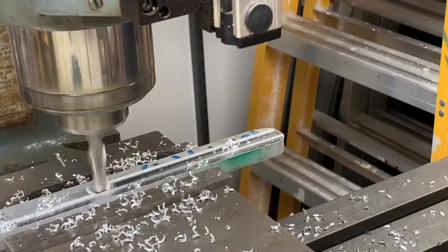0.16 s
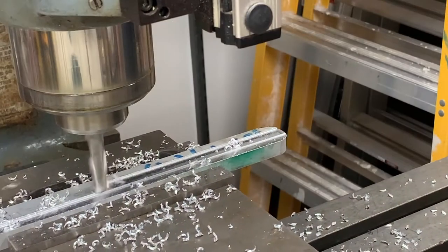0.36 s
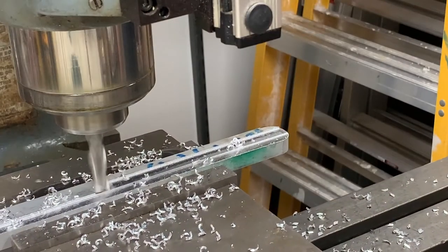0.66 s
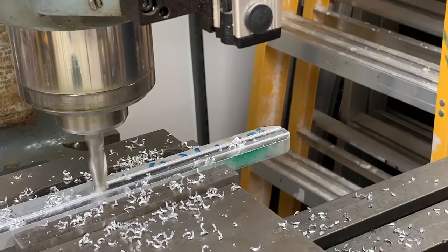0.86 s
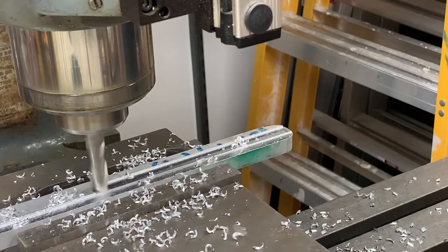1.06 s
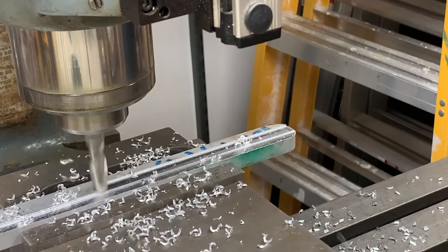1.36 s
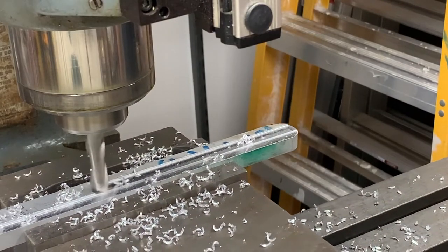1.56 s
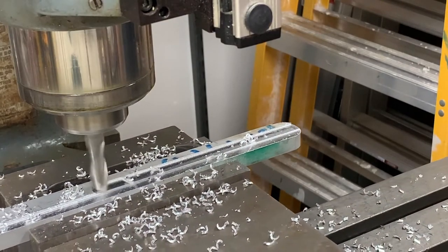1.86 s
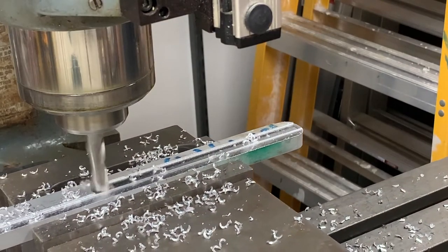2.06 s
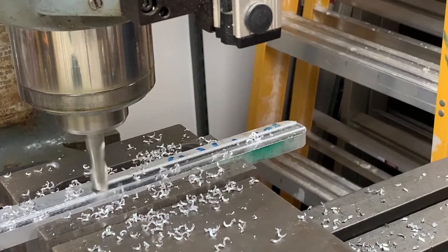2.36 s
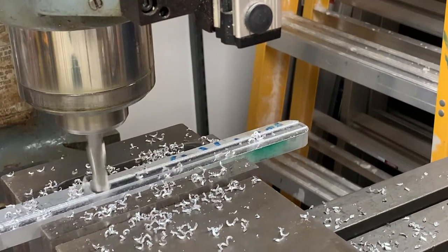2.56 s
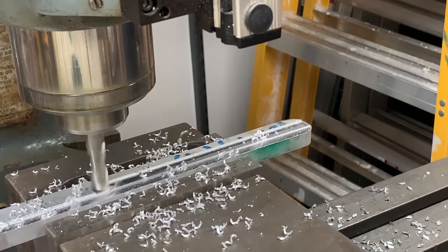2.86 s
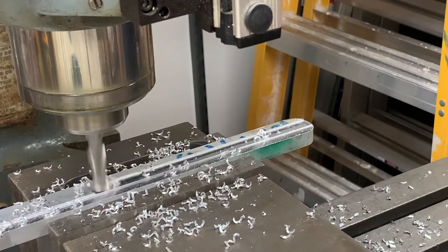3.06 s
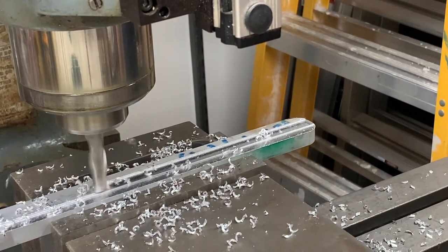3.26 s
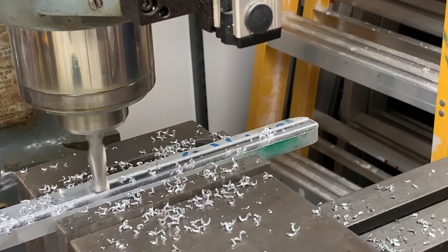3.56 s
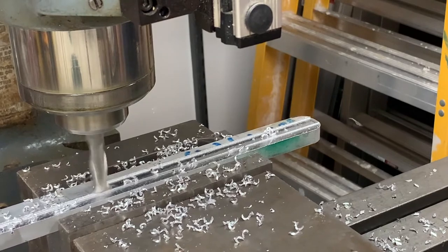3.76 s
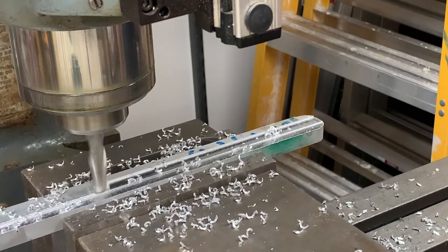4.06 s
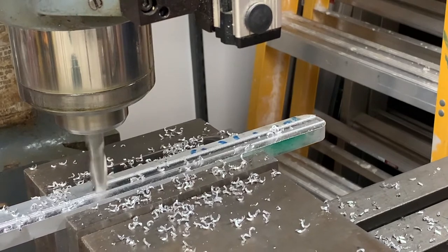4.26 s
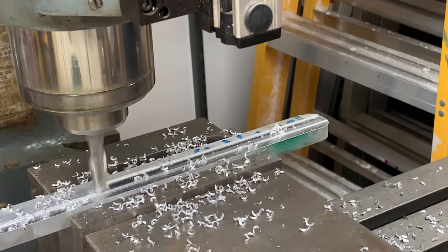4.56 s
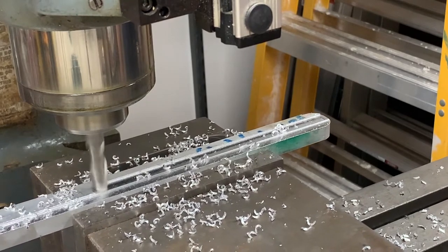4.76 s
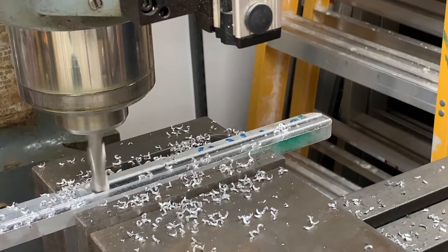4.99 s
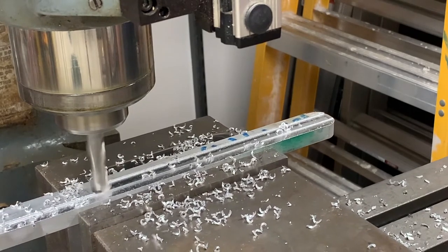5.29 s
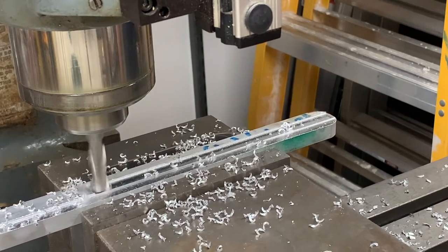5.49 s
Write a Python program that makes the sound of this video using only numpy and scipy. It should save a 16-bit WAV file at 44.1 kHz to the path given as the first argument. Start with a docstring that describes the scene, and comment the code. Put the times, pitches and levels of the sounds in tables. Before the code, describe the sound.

Close up in a small workshop, a milling machine cuts an aluminium bar without pause. A hard rasp repeats about twelve times a second, with a lighter one between, each with a short metallic clang and zing. A steady nasal gear whine and rumbling drive run underneath; curling chips squeak faintly and a few tick on the steel table.

```python
"""A two-flute milling cutter takes a steady cut along an aluminium bar in a small workshop, heard close by.
It runs off-centre: one flute rasps hard once a turn, the other lightly (shaped noise plus struck modes).
Curling chips chatter (sliding squeaks); loose ones tick against the steel table (short noise bursts).
Behind it a drive gear whines, the spindle rumbles, the motor's inverter sings (sines), and the drive rolls (noise)."""
import sys
import numpy as np
from scipy import signal
from scipy.fft import rfft, irfft
from scipy.io import wavfile
from scipy.ndimage import uniform_filter1d

SR = 44100
rng = np.random.default_rng(int(sys.argv[2]) if len(sys.argv) > 2 else 0)


def generate_wav(signal):
    """Clip the signal to [-1, 1] and save it as 16-bit WAV at the path in sys.argv[1]."""
    frames = np.transpose(np.atleast_2d(signal))
    scaled = np.clip(frames, -1, 1) * 32767
    pcm = np.round(scaled).astype(np.int16)
    wavfile.write(sys.argv[1], SR, pcm)


N = 248283
TIME = np.arange(N) / SR
FREQ = np.maximum(np.arange(N // 2 + 1) * SR / N, 1)

SPINDLE_HZ, GEAR_TEETH = 11.89, 66
HEAD_ORDER = 33  # head resonance, in multiples of the spindle rate
HISS_HZ = 2680  # above this the rasp is edge hiss
PORT_LAG_S, TOP_HZ = .000215, 15800
WHITE_RMS_GAIN = np.sqrt(SR / 2)  # unit-rms white noise to unit density per Hz


def undb(db):
    """Decibels to gain."""
    return 10 ** (np.asarray(db) / 20)


def curve(points):
    """(Hz, value) points joined on a log-frequency axis."""
    hz, value = np.transpose(points)
    return np.interp(np.log(FREQ), np.log(hz), value)


def lift(modes):
    """Minimum-phase response of a set of resonances: each rings on after it is struck."""
    lift_db = sum(db / (1 + (2 * (FREQ - hz) / width_hz) ** 2) for hz, width_hz, db in modes)
    cepstrum = irfft(np.log(undb(lift_db)), N)
    cepstrum[1:] *= 2 * (np.arange(1, N) < N / 2)  # fold to the causal half
    return np.exp(rfft(cepstrum))


def walk(rate_hz):
    """Random levels held 1 / rate_hz, smoothed twice; spread 1."""
    hold = max(int(SR / rate_hz), 1)
    steps = np.repeat(rng.standard_normal(N // hold + 1), hold)
    smooth = uniform_filter1d(uniform_filter1d(steps, hold), hold)[:N]
    return smooth / smooth.std()


def tone(cycles, level_db, pan_db=0, lag_cycles=0):
    """Stereo sine of given rms level and random phase; the right port lags."""
    angle = 2 * np.pi * (cycles + rng.random())
    left = undb(level_db + pan_db / 2) * np.sin(angle)
    right = undb(level_db - pan_db / 2) * np.sin(angle - 2 * np.pi * lag_cycles)
    return np.sqrt(2) * np.array([left, right])


def grains(spread_db):
    """Dense tiny fractures of uneven size, rms 1."""
    noise = rng.standard_normal(N) * undb(spread_db * walk(1500))
    return noise / noise.std()


def walls(t60_s=0.16):
    """One path by way of the workshop walls: a short decaying tail that ripples the spectrum."""
    tail = rng.standard_normal(N) * np.exp(-np.log(1000) * TIME / t60_s)
    return rfft(tail / np.sqrt(np.sum(tail ** 2)))


# power share of scattered and wall paths: freq_hz, share_0_to_1
SCATTER_SHARE = [(60, 0.09), (300, 0.02), (600, 0.31), (1200, 0.69), (2000, 0.88), (3300, 0.2),
                 (5000, 0.05), (9000, 0), (15000, 0)]
# stereo balance: freq_hz, left_minus_right_db
STEREO_BALANCE = [(60, 5.5), (150, -1.5), (300, 2.5), (500, 3), (750, 4), (1100, 3), (1500, 1.5), (2500, 1),
                  (4500, -0.5)]


def radiate(force, gain, spread_db, echo_share=0.46, split_hz=4650):
    """Force-driven noise coloured by the metal, heard directly, scattered, and by way of the walls."""
    direct, left, right = (rfft(force * grains(spread_db)) for _ in range(3))
    share = np.clip(curve(SCATTER_SHARE), 0, 1)
    scattered = np.array([side * (np.sqrt(1 - echo_share) + np.sqrt(echo_share) * walls())
                          for side in (left, right)])
    # machine body stands to the left, fine sizzle comes from the right
    lag_s = np.where(FREQ < split_hz, PORT_LAG_S, -PORT_LAG_S)
    ports = np.array([direct, direct * np.exp(-2j * np.pi * FREQ * lag_s)])
    both = np.sqrt(1 - share) * ports + np.sqrt(share) * scattered
    balance = undb(np.outer([1, -1], curve(STEREO_BALANCE)) / 2)
    return irfft(both * gain * balance, N)


# resonances of head, table and bar: centre_hz, width_hz, lift_db
BODY_MODES = [(666, 76, 2.5), (1082, 136, 5), (1145, 22, 5), (1323, 84, 3.5), (1586, 29, -0.5),
              (1654, 52, 6.5), (1870, 29, 2), (1920, 55, 1), (2040, 50, 6.5), (2134, 26, 7.5),
              (2170, 19, 2), (2696, 180, 3.5), (3380, 120, 5.5), (4010, 84, 4.5), (4570, 110, 3),
              (6010, 460, 5)]


def body():
    """Head, table and bar colour any noise that passes through them."""
    return lift(BODY_MODES)


# rolling noise before the body resonances: freq_hz, density_db_per_hz
DRIVE_NOISE = [(25, -85), (60, -67), (100, -65), (140, -55.5), (200, -63), (310, -62.5), (400, -55.5),
               (455, -60), (530, -56), (570, -64), (750, -67), (1900, -67.5), (2900, -77), (5500, -89),
               (10000, -92), (13000, -103), (15000, -103)]


def drive(flutter_db=1.02):
    """Bearings and belt roll on through the body resonances."""
    gain = undb(curve(DRIVE_NOISE)) * body() * WHITE_RMS_GAIN
    return radiate(undb(flutter_db * walk(40)), gain, spread_db=1.5)


# inverter switching tones: freq_hz, level_db (before trim)
INVERTER_TONES = [(9523, -69), (9711, -61.5), (9771, -81.5), (9830, -61), (9895, -63), (9954, -62.5),
                  (10018, -70), (10078, -68), (10201, -66), (10261, -63), (10325, -74), (10508, -73)]


def inverter(trim_db=-2.5):
    """Switching makes a thin steady cluster of high tones."""
    return sum(tone(hz * TIME, db + trim_db, lag_cycles=-0.18) for hz, db in INVERTER_TONES)


# motor and bearing tones: freq_hz, level_db (before trim), left_minus_right_db
BEARING_TONES = [(150.4, -48, -9.5), (796, -55, 3.5), (1047, -46, 8), (1298, -50.5, -8.5),
                 (1514, -53.5, 18), (1844, -49.5, 8.5), (1967, -54, 6.5)]


def bearings(trim_db=-2, waver_db=4.0, slip_cycles=0.21):
    """Motor and bearing tones, unsteady in level and phase."""
    return sum(tone(hz * TIME + slip_cycles * walk(14), db + trim_db + waver_db * walk(12),
                    pan_db, lag_cycles=0.13)
               for hz, db, pan_db in BEARING_TONES)


# shaking of the head: spindle_multiple, level_db (before trim)
SPINDLE_ORDERS = [(3, -62), (5, -57), (6, -50.5), (7, -49), (9, -50.5), (10, -45), (11, -48.5), (12, -45.5),
                  (13, -48), (14, -48), (16, -62), (19, -55.5), (23, -52), (25, -62), (35, -42),
                  (43, -49.5), (44, -45.5), (51, -49), (52, -48), (55, -47.5)]


def spindle(trim_db=-1, waver_db=1.0, slip_cycles=0.06):
    """Each turn shakes the head in nearly the same way: wavering harmonics of the turn."""
    return sum(tone(order * SPINDLE_HZ * TIME + slip_cycles * walk(3.97),
                    db + trim_db + waver_db * walk(3.97),
                    lag_cycles=order * SPINDLE_HZ * PORT_LAG_S)
               for order, db in SPINDLE_ORDERS)


# mesh rate under the nearly even feed: time_s, mesh_hz
MESH_SPEED = [(0, 484.1), (.6, 485.1), (1.0, 484.4), (4.4, 484.35), (4.7, 484.9), (5.15, 484.9),
              (5.63, 484.1)]
# housing tones rung by uneven teeth: gear_multiple, level_db (before swell)
GEAR_SIDEBANDS = [(68, -41), (69, -43), (70, -47), (71, -41), (72, -43), (73, -43), (74, -45), (75, -46),
                  (76, -47)]


def gear(mesh_db=-24.0, load_db=0.7, load_turn=0.23, waver_db=0.6):
    """The mesh whines, fluttering with each gear turn and swelling as each flute loads it."""
    time_s, mesh_hz = np.transpose(MESH_SPEED)
    turns = np.cumsum(np.interp(TIME, time_s, mesh_hz)) / SR / GEAR_TEETH
    # slightly off-centre: teeth arrive early and late, press harder and softer
    runout_cycles = .052 * np.sin(2 * np.pi * turns)
    flutter_db = .6 * np.cos(2 * np.pi * turns)
    swell_db = load_db * np.cos(4 * np.pi * (TIME * SPINDLE_HZ - load_turn)) + waver_db * walk(11)
    mesh = tone(GEAR_TEETH * turns + runout_cycles, mesh_db + flutter_db, pan_db=-2.5, lag_cycles=0.11)
    sidebands = sum(tone(k * turns, db + 2.4 * walk(3), lag_cycles=0.11) for k, db in GEAR_SIDEBANDS)
    return (mesh + sidebands) * undb(swell_db)


# chips striking steel: start_s, level_db, centre_hz, decay_s, ringing_0_to_1
CHIP_STRIKES = [(.519, -40, 7500, .005, .5), (.81, -52, 13440, .0057, .5), (2.109, -29, 9300, 0.0076, 0.7),
                (2.183, -36, 9500, .005, 0.4), (2.367, -26, 4870, 0.0042, 0.4), (3.075, -45, 9300, .01, .4),
                (3.35, -49, 7400, 0.0064, .8), (4.388, -43, 7970, .0048, .3), (4.807, -45, 7000, .0039, .3)]
# chip resonances: centre_hz, width_hz, lift_db
CHIP_MODES = [(5100, 170, 13), (7350, 90, 0), (8230, 90, 18), (9170, 110, 15), (9160, 98, 12),
              (10400, 150, 10), (12720, 80, 18), (13710, 80, 21), (14880, 70, 11)]


def chips(width_octaves=0.35, rise_s=0.00037, skirt_db=-15):
    """Each chip lands with a short bright tick, coloured by the shared chip resonances in the given share."""
    out, colour = 0, lift(CHIP_MODES)
    for start_s, level_db, centre_hz, decay_s, ringing in CHIP_STRIKES:
        age_s = np.maximum(TIME - start_s, 0)
        band = np.exp(-.5 * (np.log2(FREQ / centre_hz) / width_octaves) ** 2)
        skirt = undb(skirt_db) * FREQ / TOP_HZ
        gain = (1 + ringing * (colour - 1)) * (band + skirt)
        gain = gain / np.sqrt(np.mean(np.abs(gain) ** 2))
        envelope = (1 - np.exp(-age_s / rise_s)) * np.exp(-age_s / decay_s)
        out = out + undb(level_db) * rfft(envelope * rng.standard_normal((2, N))) * gain
    return irfft(out, N)


def chatter(level_db=-41.5, low_hz=900, high_hz=2300, glide_per_s=2.5, swell_s=0.0096,
            spread_db=3.5, count=200):
    """Curling chips chatter against the flutes: brief squeaks at random times, sliding up or down."""
    out, age_s = np.zeros((2, N)), TIME[:SR // 12]
    shape = age_s / swell_s * np.exp(1 - age_s / swell_s)
    places, sizes = rng.random((count, 3)), rng.standard_normal((count, 2))
    for (when, pitch, lag_cycles), (slide, size) in zip(places, sizes):
        pitch_hz = low_hz * (high_hz / low_hz) ** pitch
        cycles = pitch_hz * (age_s + glide_per_s * slide * age_s ** 2 / 2)
        squeak = shape * np.sin(2 * np.pi * np.array([cycles, cycles - lag_cycles]))
        start = int(when * (N - len(age_s)))
        out[:, start:start + len(age_s)] += undb(level_db + spread_db * size) * squeak
    return out


def flute(turn_at, width, tail, stray=0.019):
    """Force of one flute, all in turns: digs in once a turn, a little early or late, then dies away."""
    age = (TIME * SPINDLE_HZ - turn_at + stray * walk(SPINDLE_HZ) + .5) % 1 - .5
    return np.where(age < 0, np.exp(-.5 * (age / width) ** 2), np.exp(-(np.abs(age) / tail) ** 1.7))


def shudder(depth_db, level_db=-32.7, light_db=-4, depth_share=0.26, slip_cycles=0.13, flutter_db=2.5):
    """Each flute kicks the head, which hums at its resonance and dies away."""
    heavy = undb(depth_share * depth_db) * flute(turn_at=0.3, width=0.073, tail=0.19)
    light = undb(light_db) * flute(turn_at=0.774, width=0.033, tail=0.14)
    cycles = HEAD_ORDER * SPINDLE_HZ * TIME + slip_cycles * walk(45)
    return (heavy + light) * tone(cycles, level_db + flutter_db * walk(40), lag_cycles=0.072)


def ring(modes, force, vary_db, wander, rough_db=1.5, slip_cycles=0.26):
    """Resonances scraped into ringing: levels vary and pitches drift about once a turn."""
    out = 0
    for hz, width_hz, db, lag_cycles in modes:
        pitch_hz = hz * (1 + wander * walk(SPINDLE_HZ))
        cycles = np.cumsum(pitch_hz) / SR + slip_cycles * walk(width_hz)
        level_db = db + vary_db * walk(SPINDLE_HZ) + rough_db * walk(2 * width_hz)
        out = out + tone(cycles, level_db, lag_cycles=lag_cycles)
    return out * force


# ring of the bar: centre_hz, width_hz, level_db (before force), right_lag_cycles
BAR_MODES = [(1075, 50, -43.5, 0.38), (1157, 54, -47.5, -0.0062), (1353, 60, -43, 0.22),
             (1660, 70, -51, -.2), (1900, 70, -41.5, 0.16), (2113, 70, -49, -0.29)]


def bar_clang(clang_db, light_db=-7, clang_share=.6):
    """The bar clangs late in each stroke."""
    heavy = undb(clang_share * clang_db) * flute(turn_at=0.31, width=0.04, tail=0.19)
    light = undb(light_db) * flute(turn_at=.74, width=0.039, tail=0.18)
    return ring(BAR_MODES, heavy + light, vary_db=2.0, wander=.018)


# ring of the cutter's shank: centre_hz, width_hz, level_db (before trim and force), right_lag_cycles
SHANK_MODES = [(3190, 140, -41.5, 0.482), (3414, 45, -48, -0.37), (3485, 45, -47, -0.39),
               (3720, 60, -49, -0.39), (3780, 60, -50.5, -0.35), (6470, 300, -53.5, -0.39)]


def shank_zing(squeal_db, trim_db=0.66, light_db=-7):
    """The cutter's shank zings as long as a flute rubs."""
    heavy = undb(squeal_db) * flute(turn_at=0.21, width=0.058, tail=0.28)
    light = undb(light_db) * flute(turn_at=0.62, width=0.092, tail=0.55)
    return ring(SHANK_MODES, (heavy + light) * undb(trim_db), vary_db=3.0, wander=.006)


# turns with set strength of the heavy stroke, stronger or weaker:
# time_s, knock_db, clang_db, squeal_db (each before its share in a part)
TURN_LEVELS = [(.02, 0.5, -6, 3), (.104, 3.5, 0, 2), (.355, -11, -3, 0.5), (.44, 2, -1, 0.5),
               (.523, -1.5, 2, 5), (.61, -0.5, -2, -1.5), (.696, 0, 0, 3.5), (1.11, -3, -6, 0.5),
               (1.2, -4, -7, 0), (1.37, 0.5, 0, 0), (1.45, 2, 1, 2), (1.62, 0, -2, 2),
               (1.705, -14, -4.5, 3.5), (1.79, -3.5, 0, 1.5), (1.957, 2.5, 4, 4), (2.04, 6, -1, 5),
               (2.21, -1.5, -2, 3), (2.375, 6, 0, 3.5), (2.46, 0, 3, 1), (2.96, 1.5, -3, -1.5),
               (3.13, 0.5, -3, 1), (3.304, 2.5, 9, 2), (3.385, -2.5, -3, 4), (3.47, -2, -2, 1),
               (3.72, 0.5, 7, 1), (4.061, -0.5, 7, -1.5), (4.225, 4, 0, 0.5), (4.31, 1, 4, 0.5),
               (4.48, -2.5, -9, 0), (4.56, -3.5, -2, -5), (4.649, 4, 2, 0), (4.73, 0.5, 3, -2),
               (4.815, 2, -3, 4), (4.9, 2, 7, 0), (5.15, -9, -4, -1), (5.23, 1.5, 0.5, 2),
               (5.32, 0.5, 3, -2.5), (5.406, 2.5, 3.5, 2)]


def bites(uneven_db):
    """Knock, clang and squeal dB of each turn: listed turns have set levels, the others stay nearly even."""
    turn = (TIME * SPINDLE_HZ).astype(int)
    turn_db = uneven_db * rng.standard_normal((turn[-1] + 1, 3)) - .6
    for time_s, *level_db in TURN_LEVELS:
        turn_db[int(time_s * SPINDLE_HZ)] = level_db
    return turn_db[turn].T


# flute rasp before force and body resonances: freq_hz, density_db_per_hz
RASP_NOISE = [(30, -88), (150, -59), (400, -59.5), (670, -53.5), (850, -59.5), (1200, -61), (2000, -65),
              (2900, -74.5), (4200, -76.5), (6000, -87.5), (9000, -86.5), (13000, -99), (15000, -89)]


def cutter(light_db=-7, knock_db=-1, hiss_db=-1.0, uneven_db=0.1, scatter_db=0.43, tear_db=0.5,
           jerk_db=1.0, hiss_share=0.68, part_hz=1700):
    """The high flute takes most metal, the other skims half a turn later; the chip tears off in jerks."""
    depth_db, clang_db, squeal_db = bites(uneven_db)
    gain = undb(curve(RASP_NOISE)) * body() * WHITE_RMS_GAIN
    low = 1 / (1 + (FREQ / part_hz) ** 6)
    high = 1 / (1 + (HISS_HZ / FREQ) ** 6)
    # the edge first scrapes and hisses
    heavy_scrape = undb(hiss_share * squeal_db) * flute(turn_at=0.18, width=0.055, tail=0.25)
    light_scrape = undb(light_db) * flute(turn_at=0.64, width=0.032, tail=0.16)
    tearing = undb(hiss_db + scatter_db * walk(35) + tear_db * walk(250))
    hiss = (heavy_scrape + light_scrape) * tearing
    # once dug in, the table knocks and the bar grates
    heavy = flute(turn_at=0.22, width=0.044, tail=.19)
    light = undb(light_db) * flute(turn_at=0.735, width=0.054, tail=0.26)
    jerks = undb(knock_db + scatter_db * walk(35) + jerk_db * walk(200))
    knock = (undb(depth_db) * heavy + light) * jerks
    grate = (undb(clang_db) * heavy + light) * jerks
    # each force with its share of the power
    parts = [(knock, low * (1 - high)), (grate, (1 - low) * (1 - high)), (hiss, high)]
    rasp = sum(radiate(force, gain * np.sqrt(share), spread_db=3) for force, share in parts)
    return rasp + shudder(depth_db) + bar_clang(clang_db) + shank_zing(squeal_db) + chatter()


def scene():
    """The running machine and its cut."""
    return drive() + inverter() + bearings() + spindle() + gear() + chips() + cutter()


def record(dry):
    """Steep elliptic low-pass at TOP_HZ."""
    return signal.sosfilt(signal.ellip(10, .1, 80, TOP_HZ, fs=SR, output="sos"), dry)


dry = scene()
out = record(dry)
generate_wav(out)
```